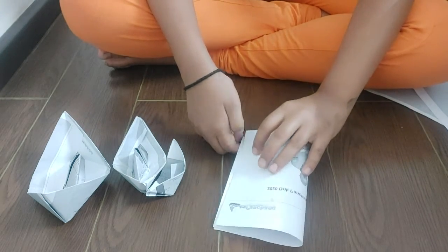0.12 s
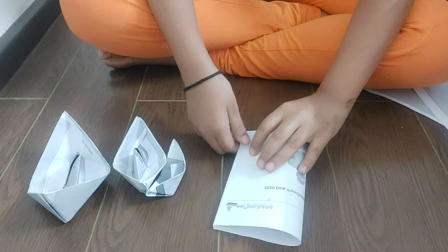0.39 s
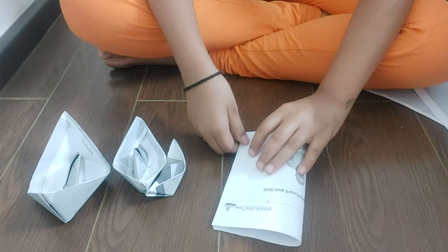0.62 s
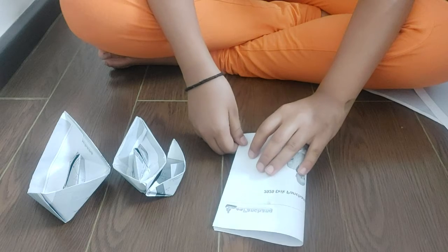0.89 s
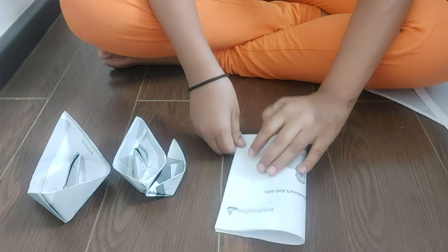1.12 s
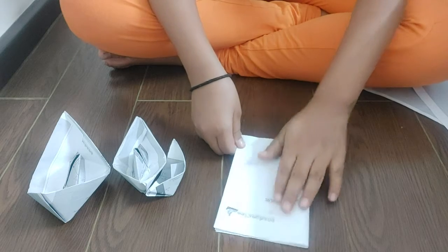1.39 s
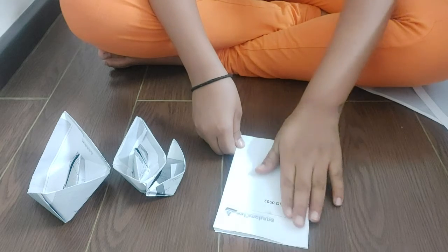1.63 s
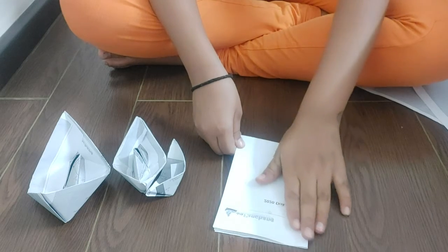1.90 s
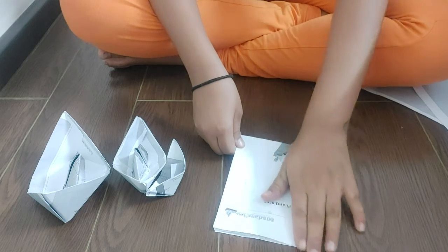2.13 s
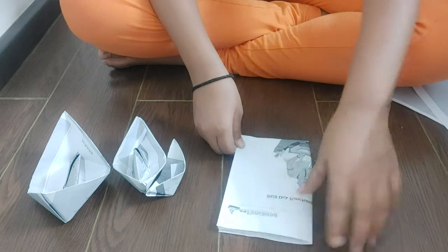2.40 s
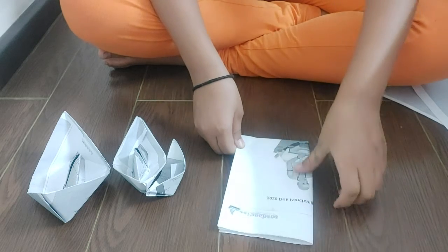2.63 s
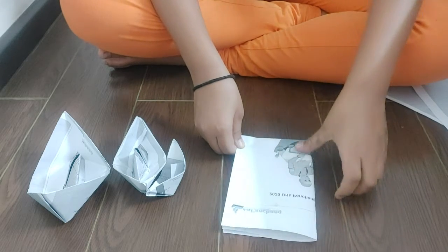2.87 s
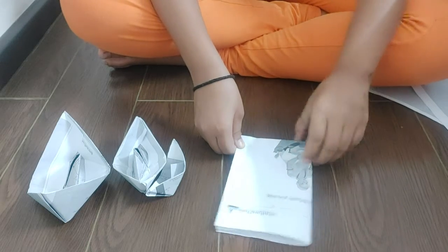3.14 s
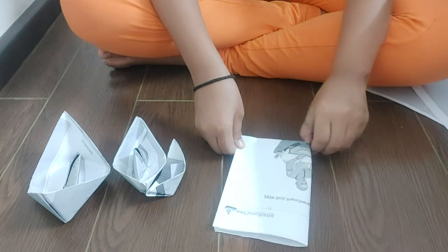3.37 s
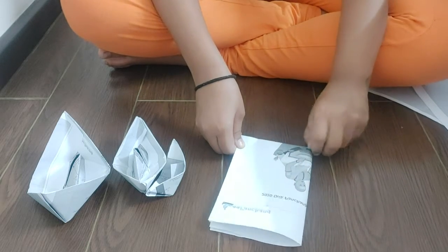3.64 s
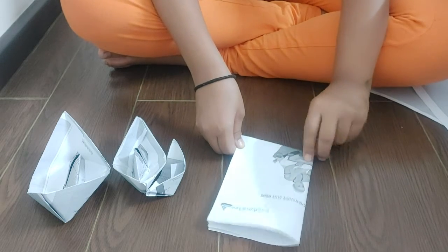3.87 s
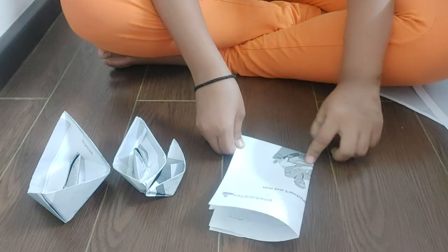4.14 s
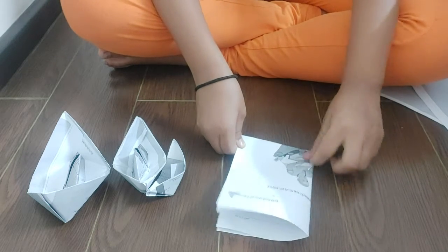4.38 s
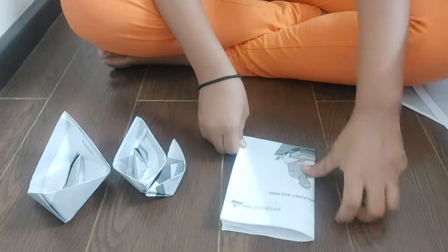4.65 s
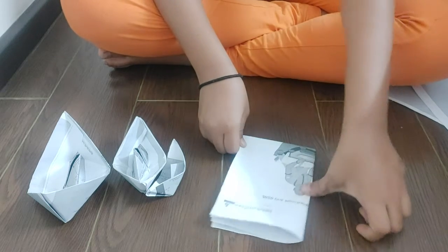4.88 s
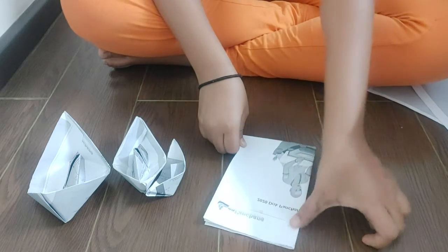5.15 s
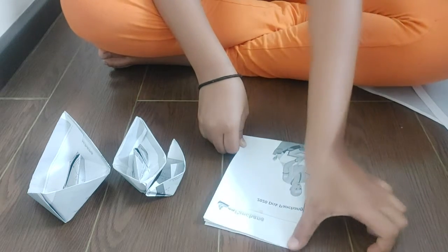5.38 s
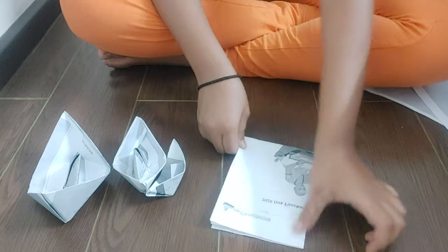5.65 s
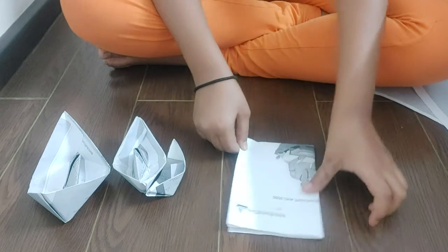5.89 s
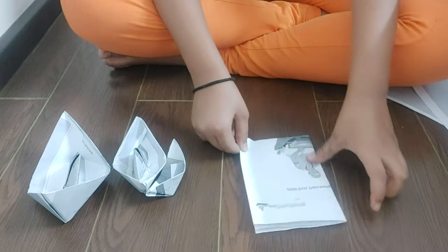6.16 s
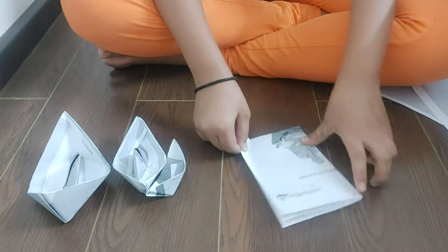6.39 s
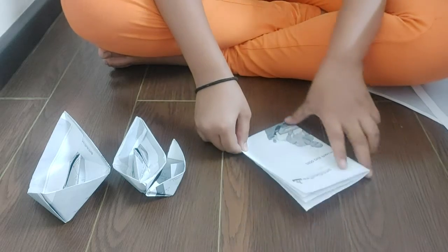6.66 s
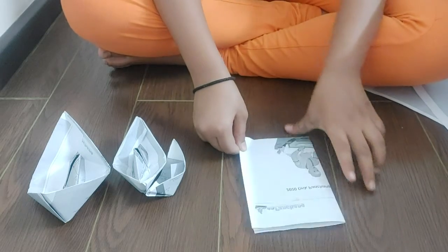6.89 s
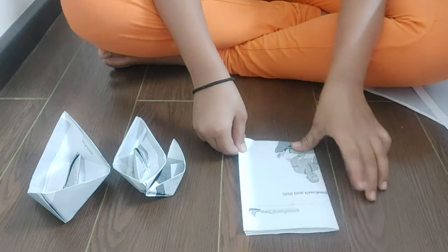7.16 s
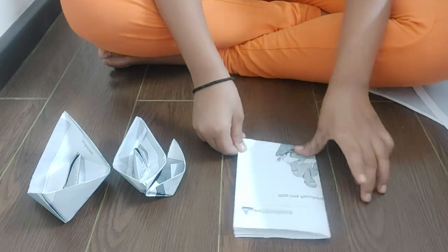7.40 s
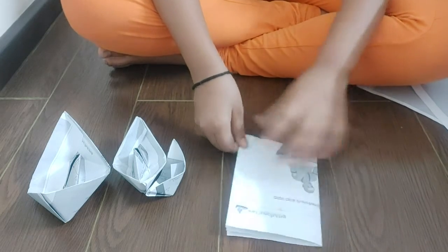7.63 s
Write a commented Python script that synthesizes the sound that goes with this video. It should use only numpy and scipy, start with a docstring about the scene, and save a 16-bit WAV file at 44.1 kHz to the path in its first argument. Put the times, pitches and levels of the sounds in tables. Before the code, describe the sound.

Close up, skin hisses and scrapes over folded paper on a floor board. A dying hollow knock opens, then near quiet, then firm creasing strokes with one hard fingertip tap and a second weaker one. Short irregular rustles and crackles follow, longer soft rubs later, a snappy paper flick near the end, then fading touches. Small reverberant room, gusts of deep rumble across the microphone, very faint distant tones.

```python
"""A hollow knock dies away while hands rub a folded sheet of paper on a hard floor, pressing the crease.
Rubbing is shaped noise that follows each stroke; taps are struck modes of the floor board, crackles are
noise bursts and pockets of air are resonators fed with noise. A draught rumbles on the two ports of a phone
as low noise in gusts; a small bare room adds a decaying tail, over faint hiss, hum and soft far tones."""
import sys
import numpy as np
from scipy import signal
from scipy.fft import rfft, irfft, next_fast_len
from scipy.io import wavfile
from scipy.ndimage import uniform_filter1d

SR = 44100
rng = np.random.default_rng(int(sys.argv[2]) if len(sys.argv) > 2 else 0)


def unload_wav(signal):
    """Save mono or channel-first audio to the path in sys.argv[1] as 16-bit WAV at rate SR, clipped to [-1, 1]."""
    wavfile.write(
        sys.argv[1],
        SR,
        np.round(np.clip(np.atleast_2d(signal).T, -1, 1) * 32767).astype(np.int16),
    )


def voltage_ratio(decibels):
    """Convert decibels (scalar or array-like) to amplitude ratios, 20 dB per decade."""
    exponent = np.asarray(decibels, float) / 20
    return 10 ** exponent


N = 342736
T = np.arange(N) / SR


def colour(x, points):
    """Spectral shaping: filter by (Hz, dB) points joined on a log frequency axis, then set the rms to 1."""
    hz, db = np.transpose(points)
    size = next_fast_len(N)
    log_hz = np.log(np.arange(size // 2 + 1) * SR / size + 1)
    gain = voltage_ratio(np.interp(log_hz, np.log(hz), db))
    y = irfft(rfft(x, size) * gain, size)[..., :N]
    return y / np.sqrt(np.mean(y ** 2))


def walk(rate):
    """Slow random modulation: levels held for 1 / rate seconds and smoothed twice, with a spread near 1."""
    hold = int(SR / rate)
    steps = np.repeat(rng.standard_normal(N // hold + 1), hold)
    return 1.08 * uniform_filter1d(uniform_filter1d(steps, hold), hold)[:N]


def pair(alike, grit_db=0.):
    """Partial coherence: left and right noise of a given correlation; grit makes some moments louder."""
    mid, side = rng.standard_normal((2, N))
    alike = np.clip(alike, 0, 1)
    bursts = np.minimum(rng.exponential(size=N // 16 + 1), 5)
    grit = voltage_ratio(grit_db * bursts).repeat(16)[:N]
    return grit * (np.sqrt(1 + alike) * mid + np.sqrt(1 - alike) * side * np.array([[1], [-1]]))


def ring(modes, length):
    """Modal superposition: a sum of sines dying exponentially, each by 60 dB in its t60."""
    t = np.arange(int(length * SR)) / SR
    return sum(voltage_ratio(db) * np.sin(2 * np.pi * hz * t) * 1000. ** (-t / t60) for hz, db, t60 in modes)


def add(out, s, x):
    """Linear superposition: mix x into out from time s in seconds."""
    i = int(s * SR)
    out[..., i:i + x.shape[-1]] += x[..., :N - i]


# Spectrum of the microphone hiss. Each row: frequency [Hz], relative level per hertz [dB].
HISS_FLOOR_SPECTRUM = [(150, -22), (250, -20), (400, -5.5), (700, -5.5), (1000, -8.5), (1300, -11),
                       (1760, -14.5), (2550, -21.5), (5000, -27.5), (7410, -11.5), (9000, -28),
                       (15500, -40)]
# Harmonics of the mains. Each row: frequency [Hz], mean level [dB].
MAINS_HUM = [(300, -81), (400, -88)]


def background():
    """Self-noise: microphone hiss almost unrelated left and right, with steady harmonics of the mains."""
    hum = sum(voltage_ratio(db + 2 * walk(0.77)) * np.sin(2 * np.pi * hz * T) for hz, db in MAINS_HUM)
    hiss_db = -76 + 0.2 * walk(0.35)
    return voltage_ratio(hiss_db) * colour(pair(0.11), HISS_FLOOR_SPECTRUM) + hum


# Close modes of the hollow knock. Each row: frequency [Hz], level before panning [dB], t60 [s].
KNOCK_MODES = [(470, -31.5, 0.24), (487.4, -38, 0.34), (500, -43, 0.07), (850, -51.5, 0.28),
               (866, -67, 0.2), (750, -55, 0.36)]
# Far soft tones. Each row: centre time [s], frequency [Hz], mean level [dB], time from centre to 1/e [s].
FAR_TONES = [(0.955, 497, -79, 0.02), (1.092, 496, -75, 0.02), (1.167, 495, -74, 0.027),
             (3.518, 565, -76, 0.041), (5.665, 563, -69.5, 0.035), (5.896, 570, -60, 0.044),
             (5.965, 560, -70, 0.04), (6.477, 376, -57.5, 0.0053)]


def distant():
    """Beating: close modes of a knock interfere as they die, over a dull echo; far tones swell and fade."""
    knock, tones = np.zeros(N), np.zeros(N)
    add(knock, 0, ring(KNOCK_MODES, .5))
    echo = rng.standard_normal((2, N)) * 1000. ** (-T / 0.42)
    echo = voltage_ratio(-77.5) * colour(echo, [(250, -13), (500, 2.0), (850, 1), (1500, -6), (4000, -44)])
    for s, hz, db, half_s in FAR_TONES:
        swell = np.exp(-((T - s) / half_s) ** 2)
        tones += voltage_ratio(db) * np.sin(2 * np.pi * hz * T) * swell
    return knock * voltage_ratio(np.array([[1.5], [-1.5]])) + echo + tones * voltage_ratio(2.2 * walk(40))


# Spectra of rumble, throb and flutter. Each row: frequency [Hz], relative level per hertz [dB].
RUMBLE_SPECTRUM = [(30, -23), (42, 23), (52, 23.5), (75, 18.5), (95, -5.5), (130, -49.5)]
THROB_SPECTRUM = [(60, -16.5), (90, 0), (104, -0.5), (114, 5), (126, -5), (150, -7), (190, -28.5),
                  (260, -65)]
FLUTTER_SPECTRUM = [(110, -10.5), (170, -0.5), (240, -6.5), (330, -13.5), (480, -20), (800, -39.5)]
# Course of the draught. Each row: time [s], gust setting [dB], throb against that setting [dB].
GUST_COURSE = [(0.0, -56.5, -3.5), (0.65, -52.5, -1.5), (0.95, -61, 3), (0.97, -51, 2), (1.25, -59, -6.5),
               (1.45, -54, 4.5), (2.03, -60.5, -1), (2.16, -45, -2.5), (2.25, -57, 11.5), (2.29, -44, -4),
               (2.49, -56.5, 7), (2.57, -48.5, -3.5), (2.62, -61.5, 10), (2.68, -58, -1.5),
               (4.05, -70.5, -5), (4.54, -63.5, 2.5), (4.61, -51.5, 1), (4.85, -41.5, 10), (4.93, -40, -5),
               (4.95, -42, -1.5), (5.41, -42, -7.5), (5.45, -50.5, 6.5), (5.63, -42, -6.5),
               (6.3, -62, -6.5), (6.64, -52, 0.5), (6.88, -56.5, -5.5), (7.18, -61.5, 0),
               (7.42, -49.5, -5.5), (7.53, -64, 2), (7.6, -49.5, -1.5), (7.64, -54.5, 10),
               (7.74, -46, -2.5), (7.77, -50.5, -1)]
DRAUGHT_LIKENESS = .985  # correlation between the ports
# Strong gusts strike both ports alike; in lulls the right port is the windier.
EVEN_GUST_DB, LULL_PAN_DB_PER_DB = -49.5, 0.5


def draught():
    """Turbulent pressure: gusts drive a deep rumble and a throb; a lighter flutter follows the mean gust."""
    gust_s, gust_points_db, throb_points_db = np.transpose(GUST_COURSE)
    level_db = np.interp(T, gust_s, gust_points_db)
    throb_db = np.interp(T, gust_s, throb_points_db)
    pan_db = LULL_PAN_DB_PER_DB * np.minimum(level_db - EVEN_GUST_DB, 0)
    mean_gust_db = uniform_filter1d(level_db + np.maximum(throb_db, 0), size=SR // 3)
    rumble = colour(pair(DRAUGHT_LIKENESS), RUMBLE_SPECTRUM) * voltage_ratio(level_db + 0.5 + 2.2 * walk(8.1))
    throb = colour(pair(DRAUGHT_LIKENESS), THROB_SPECTRUM) * voltage_ratio(level_db + throb_db + 1.6 * walk(12))
    flutter = colour(pair(0.34), FLUTTER_SPECTRUM) * voltage_ratio(0.66 * mean_gust_db - 31 + 2.3 * walk(14))
    return (rumble + throb) * voltage_ratio(np.array([pan_db, -pan_db]) / 2) + flutter


# Reverberation of the small bare room. Each row: band centre [Hz], t60 [s].
ROOM_DECAY = [(550, 0.34), (1600, 0.38), (4000, 0.16), (12000, 0.26)]
ECHO_SCATTER_DB = 2.5  # walls and furniture send the sound back in uneven clumps


def room(x):
    """Diffuse reverberation: convolution with noise that decays band by band, separate for each side."""
    t = np.arange(SR // 2) / SR
    tail = 0
    for hz, t60 in ROOM_DECAY:
        band = signal.butter(1, [hz / 2, min(hz * 1.7, .45 * SR)], "band", fs=SR, output="sos")
        tail = tail + signal.sosfilt(band, rng.standard_normal((2, len(t)))) * 1000. ** (-t / t60)
    onset = np.clip((t - .007) / 0.011, 0, 1)  # the tail builds up after the first walls
    tail = tail * onset * voltage_ratio(ECHO_SCATTER_DB * walk(150)[:len(t)])
    tail = tail / np.sqrt(np.sum(tail ** 2) / 2)
    return signal.fftconvolve(x[None], tail, axes=1)[:, :N]


# Crackles of the sheet. Each row: start [s], nominal peak level [dB], centre frequency [Hz],
# left minus right [dB], decay time to 1/e [ms].
SHEET_CRACKLES = [(0.1444, -38, 2940, 1, 2.7), (0.152, -36, 1000, 4, 5.6), (0.169, -44, 1050, 1, 4.7),
                  (1.049, -52.5, 7100, 2, 2.9), (1.2919, -44.5, 2500, 1, 7.1), (1.37, -49, 2000, -4, 4),
                  (1.45, -38.5, 1450, -2, 6), (2.49, -54.5, 6500, 10, 2.7), (2.987, -45, 1620, -6, 2.8),
                  (3.062, -52.5, 7550, 2, 4.5), (3.141, -47, 7100, 1, 3.3), (3.2, -52, 2080, -12, 3.3),
                  (3.434, -42, 2320, 0, 3.34), (3.635, -49.5, 7400, -1, 3.4), (3.912, -53, 2440, 2.0, 2.7),
                  (3.945, -46, 5960, 5, 1.1), (3.9711, -35.5, 6600, 11.5, 2.3),
                  (4.4297, -50, 7140, 12, 3.4), (4.832, -36, 3470, -12, 1.8), (4.911, -39.5, 1610, -3, 1.8),
                  (5.5, -56, 7170, 6, 4.2), (6.7022, -30.5, 3120, 0, 2.7), (6.789, -33, 3300, -4, 1.9),
                  (6.998, -47, 4930, 2.5, 3.6), (7.1967, -51.5, 7150, 4, 3), (7.206, -46, 1030, -3, 4.4)]


def crackles():
    """Impulsive buckling: each buckle of the sheet is a short noise burst with a broad spectral peak."""
    out = np.zeros((2, N))
    t = np.arange(2048) / SR
    wide = signal.butter(1, [900, 9000], "band", fs=SR)
    noises = rng.standard_normal((len(SHEET_CRACKLES), 2, len(t)))
    for (s, db, hz, pan_db, ms), noise in zip(SHEET_CRACKLES, noises):
        both_sides = noise[0] + .55 * noise[1] * np.array([[1], [-1]])
        burst = both_sides * np.exp(-t * 1000 / max(ms, .3))
        peak = signal.iirpeak(hz, 1.1, SR)
        peaked = signal.lfilter(*peak, signal.lfilter(*peak, burst))
        burst = peaked + 0.31 * signal.lfilter(*wide, burst)
        # 10.5 dB from the nominal peak down to the rms of the onset
        side_db = db - 10.5 + np.array([[pan_db], [-pan_db]]) / 2
        add(out, s, voltage_ratio(side_db) * burst / burst[:, :128].std())
    return out


# Finger taps. Each row: start [s], onset rms level [dB], strongest frequency [Hz],
# fall-off [dB per octave squared], rebound delay [ms].
FINGER_TAPS = [(1.7304, -25.5, 2960, 4, 1.7), (2.0580, -32, 2460, 8, 4), (2.237, -52, 1450, 10.5, 3.3),
               (2.288, -41, 1760, 5.5, 3.1)]
# Modes of the floor board under the sheet. Each row: frequency [Hz], relative level [dB], t60 [s].
BOARD_MODES = [(646, 8, 0.026), (850, 0, 0.014), (1480, 1.5, 0.015), (2027, 0, 0.02), (2515, 1.5, 0.016),
               (3470, 1.5, 0.008), (3870, 1, 0.0085), (4290, -1, 0.011), (4980, -1.5, 0.0085),
               (5850, 2, 0.0033), (7200, 4, 0.0074), (9500, 8.5, 0.0022), (12100, 10, 0.0039),
               (14000, 10.5, 0.004)]
# Against a firm tap, lighter ones rebound more and are heard more by way of the walls.
FIRM_TAP_DB, REBOUND_DB, TAP_ROOM_DB = -31.5, -9.5, -6.5
LIGHTNESS = 0.28  # dB gained per dB below a firm tap
WALL_ECHO_MS, WALL_ECHO_DB = 15.5, -19  # the nearest wall returns each tap once, clearly


def taps():
    """Impact excitation: a fingertip strikes and rebounds; contact time favours the modes near one pitch."""
    near, far = np.zeros(N), np.zeros(N)
    for s, db, hz, fall_db, ms in FINGER_TAPS:
        light_db = LIGHTNESS * (FIRM_TAP_DB - db)
        rebound_db = REBOUND_DB + light_db
        room_db = db + TAP_ROOM_DB + light_db
        # a negative frequency turns every second mode upside down
        modes = [((-1) ** k * f, g - fall_db * np.log2(f / hz) ** 2, t60)
                 for k, (f, g, t60) in enumerate(BOARD_MODES)]
        blow = ring(modes, 0.076)
        blow = voltage_ratio(db) * blow / blow[:256].std()
        add(near, s, blow)
        add(near, s + ms / 1000, -voltage_ratio(rebound_db) * blow)
        add(near, s + WALL_ECHO_MS / 1000, voltage_ratio(WALL_ECHO_DB) * blow)
        # the walls hear the board from all sides, so its modes blur together and the low ones gain
        blurred_modes = [(f, g - 5.2 * np.log2(abs(f) / hz), 0.5 * t60) for f, g, t60 in modes]
        blur = ring(blurred_modes, .04)
        add(far, s, voltage_ratio(room_db) * blur / blur[:256].std())
    # the right port hears it a moment later
    right = 1.16 * np.roll(near, 1) + 0.43 * np.roll(near, 9)
    return np.array([near, right]), far


# Pockets of air under the bent sheet. Each row: start [s], length [s], frequency [Hz],
# bandwidth of each of two equal filters [Hz], rms level [dB].
AIR_POCKETS = [(1.494, 0.18, 1420, 250, -64.5), (1.57, 0.18, 2560, 300, -72), (1.9, .15, 2420, 500, -68.5),
               (2.287, 0.064, 3080, 300, -63), (2.29, 0.051, 687, 500, -57.5),
               (2.3, 0.076, 1920, 201, -66.5), (2.59, 0.63, 1900, 300, -79.5),
               (1.744, 0.061, 1480, 200, -55.5), (4.38, 0.084, 1680, 250, -72.5),
               (4.515, 0.051, 1750, 250, -62.5), (4.517, 0.044, 3400, 350, -53),
               (4.515, 0.057, 2830, 250, -57.5), (6.27, 0.48, 2490, 298, -80),
               (6.486, .35, 2060, 300, -75.5), (6.81, 0.058, 2770, 500, -68),
               (6.824, 0.034, 1800, 200, -71), (6.888, .02, 2700, 600, -67.5)]


def pockets():
    """Cavity resonance: gritty noise in quick uneven catches makes each pocket sing as the hand passes."""
    out = np.zeros((2, N))
    grain = pair(0.42, 1.9) * voltage_ratio(2 * walk(120))
    for s, length, hz, width, db in AIR_POCKETS:
        i, n = int(s * SR), int(length * SR)
        peak = signal.iirpeak(hz, hz / width, SR)
        catch = grain[:, i:i + n] * signal.windows.tukey(n, .4)
        sung = signal.lfilter(*peak, signal.lfilter(*peak, catch))
        add(out, s, voltage_ratio(db) * sung / sung.std())
    return out


# Strokes of skin on paper. Each row: start [s], length [s], hiss setting off [dB], hiss stopping [dB],
# pressure as scrape against hiss [dB].
HAND_STROKES = [(0.0, 0.137, -60, -86.5, 1.5), (0.148, 0.015, -56, -72, -0.5),
                (0.191, 0.15, -77, -65, -1.5), (0.524, 0.1, -76.5, -69.5, -8.5),
                (1.01, 0.27, -88, -57, -4.5), (1.291, 0.14, -61.5, -59.5, -6),
                (1.457, 0.062, -62.5, -56.5, -2), (1.526, 0.2, -61, -67, -0.5),
                (1.736, 0.15, -51.5, -68.5, 4), (1.899, 0.31, -58, -57, -1.5),
                (2.248, 0.19, -58, -79.5, -3.5), (2.583, .4, -65, -61, -3), (2.99, .02, -56.5, -59, -9),
                (3.142, 0.011, -66.5, -59.5, -2), (3.203, 0.094, -59.5, -58.5, -1.5),
                (3.417, 0.0089, -67.5, -62, -5), (3.465, 0.0456, -86, -74, 3.5),
                (3.636, 0.0103, -65.5, -61, -5), (3.685, 0.027, -58.5, -50, -10.5),
                (3.717, 0.03, -56.5, -60.5, 0), (3.781, 0.031, -57, -67.5, -3),
                (3.921, 0.069, -74.5, -80, 5.5), (3.966, 0.0077, -48.5, -59, -1),
                (3.995, 0.216, -84, -89, 1.5), (4.279, 0.067, -69, -64, -2.5), (4.388, 0.022, -77, -77, 3),
                (4.422, 0.05, -59, -53, -3), (4.509, 0.06, -50.5, -54.5, -1.5),
                (4.565, 0.1, -55, -55.5, -2.5), (4.774, 0.031, -63.5, -69, -3.5),
                (4.83, 0.078, -58, -52.5, -4.5), (4.929, 0.11, -70, -52.5, -5),
                (5.081, 0.17, -55.5, -63, -3.5), (5.259, 0.29, -62, -77.5, -14.5),
                (5.647, 0.099, -66, -60, -12.5), (5.755, 0.11, -62.5, -58.5, -8),
                (5.866, 0.167, -62, -59.5, -2.5), (6.02, 0.328, -63.5, -65.5, -3),
                (6.374, 0.28, -65.5, -67, 2), (6.527, 0.054, -60.5, -64, 3),
                (6.595, 0.095, -59.5, -59, -3.5), (6.692, 0.12, -62.5, -65.5, -5),
                (6.778, 0.036, -57.5, -61.5, -5.5), (6.87, 0.038, -58.5, -63.5, -4),
                (6.916, 0.07, -72, -76, -4), (6.995, 0.0404, -66.5, -63.5, 1.5),
                (7.044, 0.135, -78, -80.5, -4), (7.201, 0.019, -58.5, -72.5, -2.5),
                (7.296, 0.072, -68.5, -76, -2), (7.385, 0.17, -70.5, -67.5, 1.5),
                (7.574, 0.0416, -64, -66, -2)]
SET_OFF_DB_PER_S, LIFT_OFF_DB_PER_S = 1799.5, 751


def strokes():
    """Energy summation: strokes set off fast, glide between two levels and lift off; their powers add."""
    t = np.arange(0, N / SR + .002, .001)
    hiss_power, scrape_power = 1e-10, 1e-10
    for s, length, first_db, last_db, pressure_db in HAND_STROKES:
        glide_db = np.interp(t, [s, s + max(length, .004)], [first_db, last_db])
        set_off_db = SET_OFF_DB_PER_S * np.maximum(s - t, 0)
        lift_off_db = LIFT_OFF_DB_PER_S * np.maximum(t - s - length, 0)
        db = glide_db - set_off_db - lift_off_db
        hiss_power = hiss_power + voltage_ratio(2 * db)
        scrape_power = scrape_power + voltage_ratio(2 * (db + pressure_db))
    return (np.interp(T, t, 10 * np.log10(power)) for power in (hiss_power, scrape_power))


SHEET_DRIFT = .07  # spread, as a share of the pitch


def wandering(x, hz, width):
    """Time-varying resonance: one pole whose pitch drifts as the sheet bends under the hand."""
    drifting_hz = hz * (1 + SHEET_DRIFT * walk(6))
    turn = np.exp(2j * np.pi * np.cumsum(drifting_hz) / SR)
    # shift down to zero frequency, smooth there, shift back up
    smooth = signal.lfilter([1], [1, -np.exp(-np.pi * width / SR)], x / turn)
    return np.real(turn * smooth) * np.pi * width / SR


# Spectra of hiss, scrape and sheet body. Each row: frequency [Hz], relative level per hertz [dB].
HISS_SPECTRUM = [(3500, -14), (5000, -2), (6500, 0.5), (7470, 7), (8240, 1.5), (11800, -1.5), (15500, -6.5)]
SCRAPE_SPECTRUM = [(1700, -29.5), (2350, -19.5), (2850, -12.5), (3500, -4.5), (4300, -5.5), (5400, -7),
                   (8000, -31)]
BODY_SPECTRUM = [(700, -20), (1250, -21.5), (1550, -4.5), (1800, -5), (2150, -3.5), (2550, -1.5),
                 (3000, -2.5), (4200, -27)]
# How freely the sheet drums under the hand. Each row: time [s], sheet body against scrape [dB].
SHEET_LOOSENESS = [(0, 1.5), (1.1, -11), (1.5, -1), (2.4, -5.5), (2.7, -5.5), (3.3, 0.5), (4.2, 1),
                   (4.45, -5), (4.9, -2), (5.2, -15.5), (5.9, -21), (6.45, -18), (6.8, -4), (7.0, -15),
                   (7.25, -5.5), (7.77, -11.5)]
# Narrow resonances of the pressed sheet. Each row: mean frequency [Hz], width [Hz], relative level [dB].
SHEET_RESONANCES = [(1065, 120, 0), (1705, 76, -3), (2150, 120, -3.5), (2500, 300, -0.5), (3510, 250, -0.5),
                    (4340, 760, -7)]
FIBRE_SNAPS_PER_S, FIBRE_SNAP_DB = 250, -19  # level against the hiss
SHEET_RING_DB, RUB_PAN_DB = -5, 0.6  # ring against the body; left minus right


def rubbing():
    """Stick-slip friction: fibres catch and snap; pressure brings the scrape, a loose sheet its body and ring."""
    hiss_db, scrape_db = strokes()
    body_db = scrape_db + np.interp(T, *np.transpose(SHEET_LOOSENESS))
    hiss = colour(pair(0.046, 2.3), HISS_SPECTRUM) * voltage_ratio(hiss_db + 1.9 * walk(35))
    scrape = colour(pair(0.16, 2.36), SCRAPE_SPECTRUM) * voltage_ratio(scrape_db + 0.9 * walk(45))
    body = colour(pair(0.17, 3.1), BODY_SPECTRUM) * voltage_ratio(body_db + 2.0 * walk(35))
    grain = pair(0.49, 3.9)
    rings = sum(voltage_ratio(db + 2.5 * walk(5.7)) * wandering(grain, hz, width)
                for hz, width, db in SHEET_RESONANCES)
    rings = rings / rings.std() * voltage_ratio(body_db + SHEET_RING_DB)
    # fibre snaps: random impulses of uneven size, each a very short noise burst
    snap_sizes = voltage_ratio(4 * np.minimum(rng.exponential(size=N), 4))
    impulses = (rng.random(N) < FIBRE_SNAPS_PER_S / SR) * snap_sizes
    burst = pair(0.55)[:, :128] * np.exp(-np.arange(128) / SR / 0.00093)
    ticks = signal.fftconvolve(impulses[None], burst, axes=1)[:, :N]
    ticks = colour(ticks, [(1200, -29.5), (2500, -3.0), (7500, 5.0), (15500, -8.5)])
    ticks = ticks * voltage_ratio(hiss_db + FIBRE_SNAP_DB)
    sides = voltage_ratio(np.array([[RUB_PAN_DB], [-RUB_PAN_DB]]) / 2)
    unevenness = voltage_ratio(1.1 * walk(60) + 1.8 * walk(21.99))
    return sides * unevenness * (hiss + scrape + body + rings + ticks)


def scene():
    """Superposition: all sources add at the two ports; rubbing, taps, crackles and far sounds wake the room."""
    near, far = taps()
    rub, snaps, others = rubbing() + pockets(), crackles(), distant()
    to_walls = far + voltage_ratio(-8.0) * rub[0] + voltage_ratio(-7.5) * snaps.mean(0) + voltage_ratio(-12.5) * others.mean(0)
    return rub + near + snaps + others + room(to_walls) + draught() + background()


def roll_off(x):
    """The treble ends steeply here."""
    return signal.sosfilt(signal.butter(12, 15750, fs=SR, output="sos"), x)


def record(dry):
    """Band limiting: the phone cuts the top above 15750 Hz and the deepest bass below 39 Hz."""
    no_top = signal.sosfilt(signal.ellip(8, .2, 50, 15750, fs=SR, output="sos"), dry)
    finished = signal.sosfilt(signal.butter(8, 39., "high", fs=SR, output="sos"), no_top)
    return roll_off(finished)


dry = scene()
out = record(dry)
unload_wav(out)
```